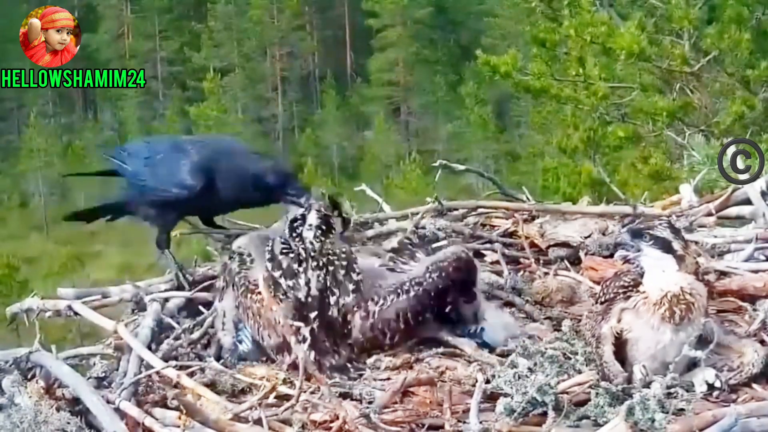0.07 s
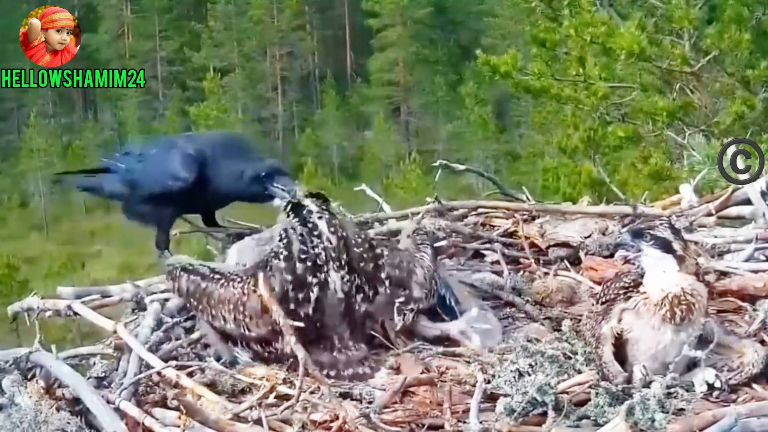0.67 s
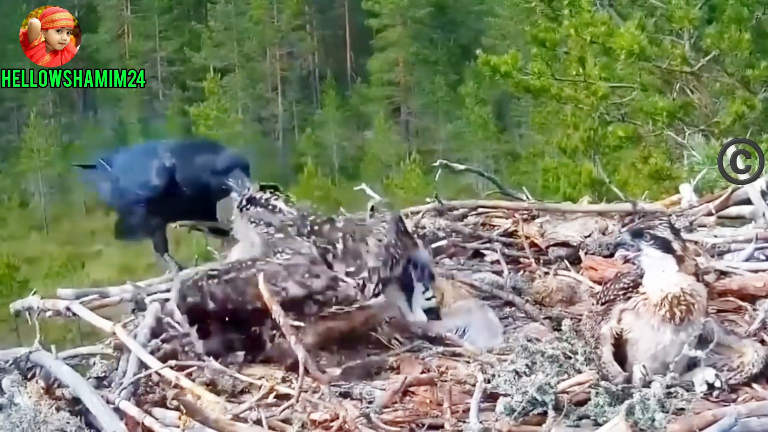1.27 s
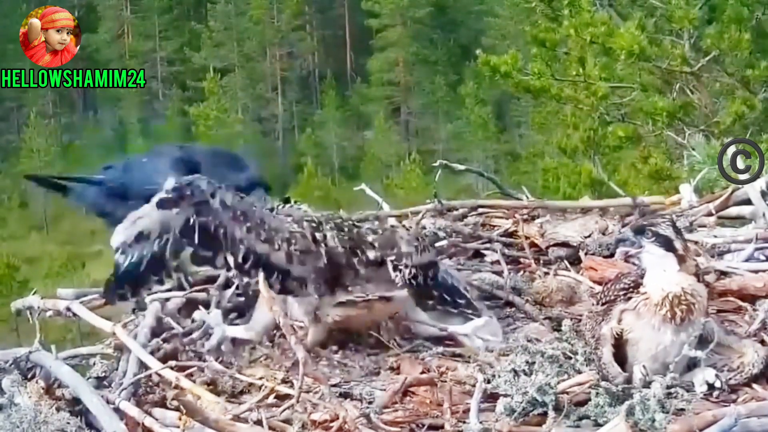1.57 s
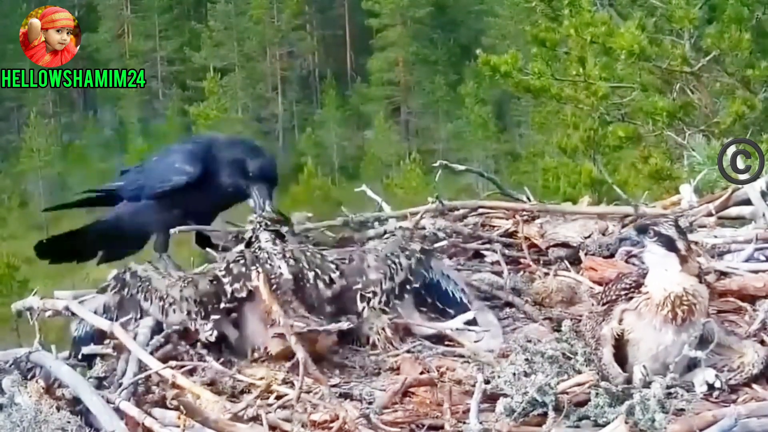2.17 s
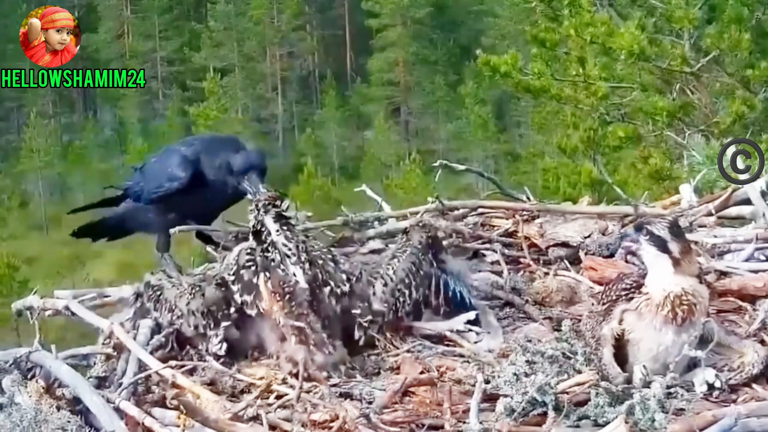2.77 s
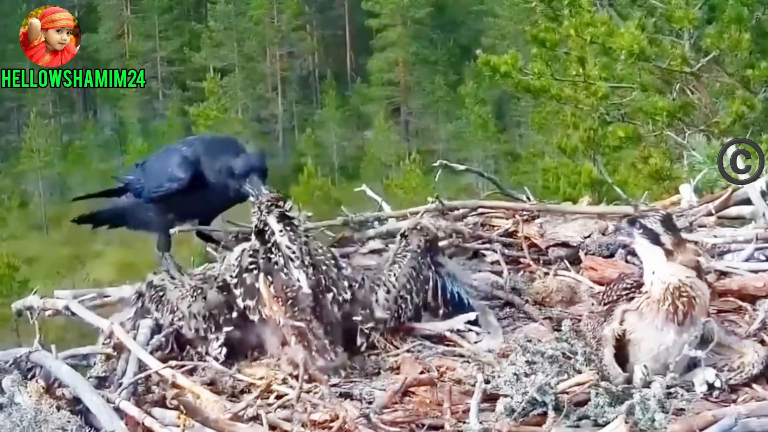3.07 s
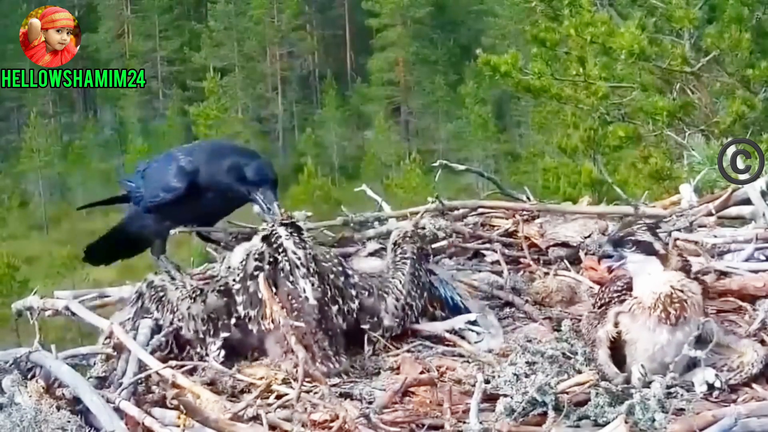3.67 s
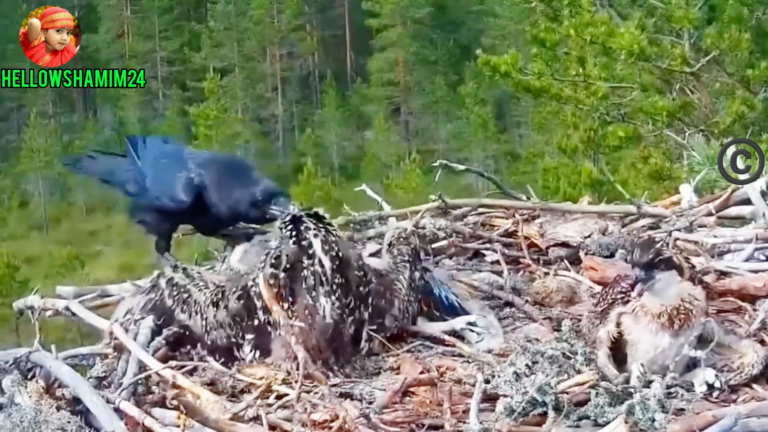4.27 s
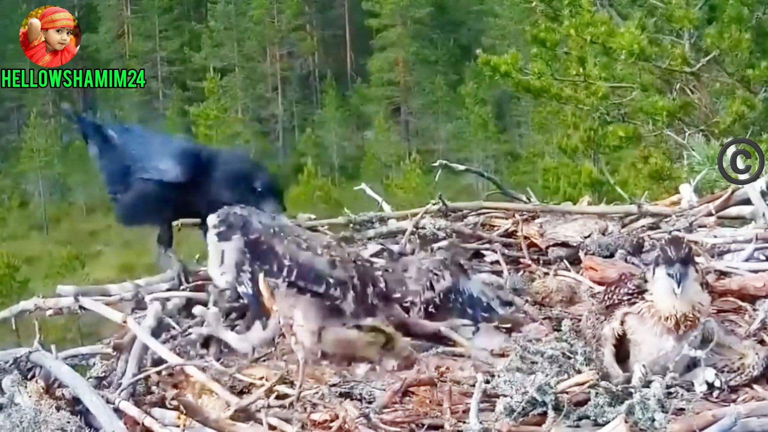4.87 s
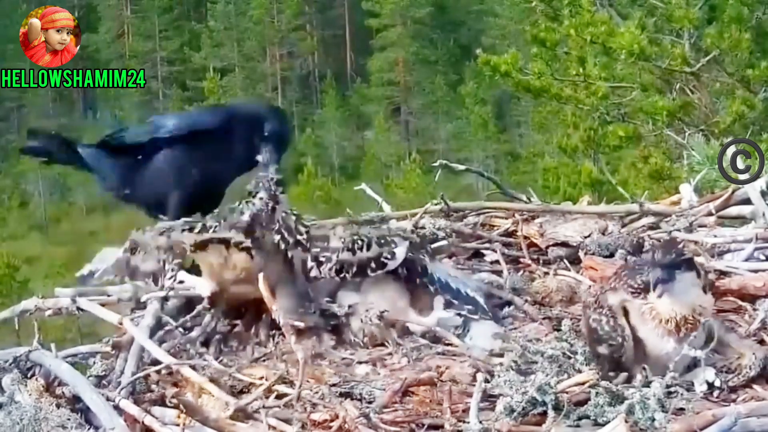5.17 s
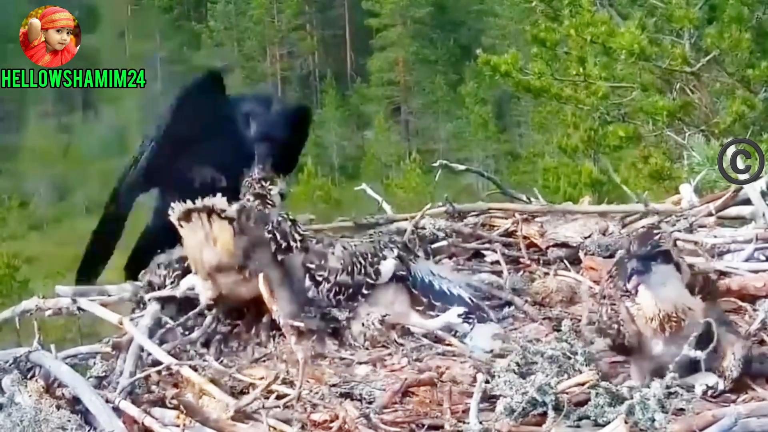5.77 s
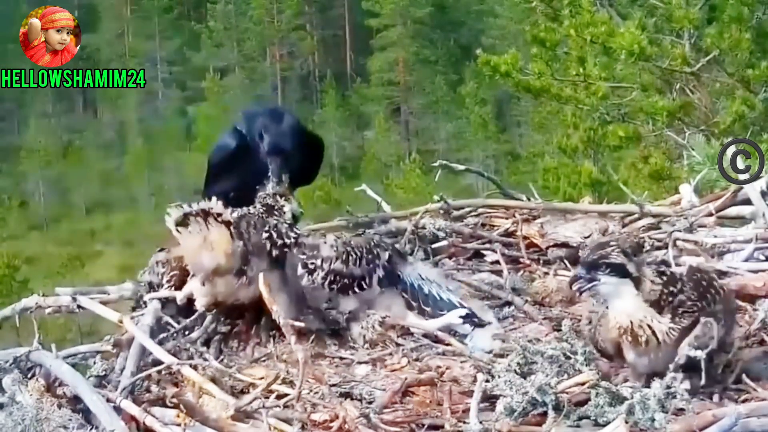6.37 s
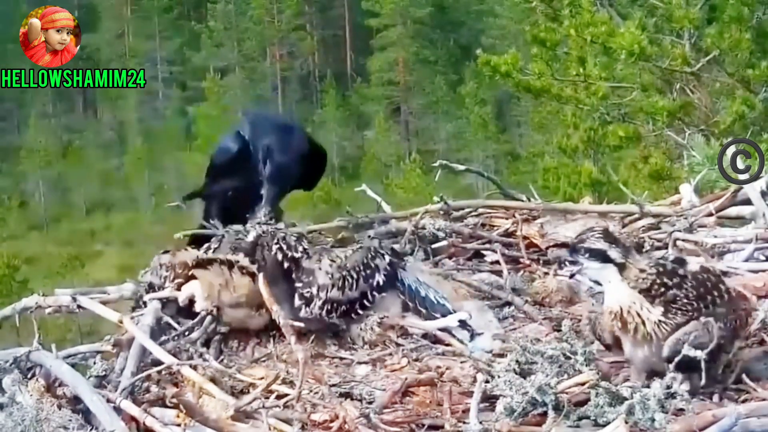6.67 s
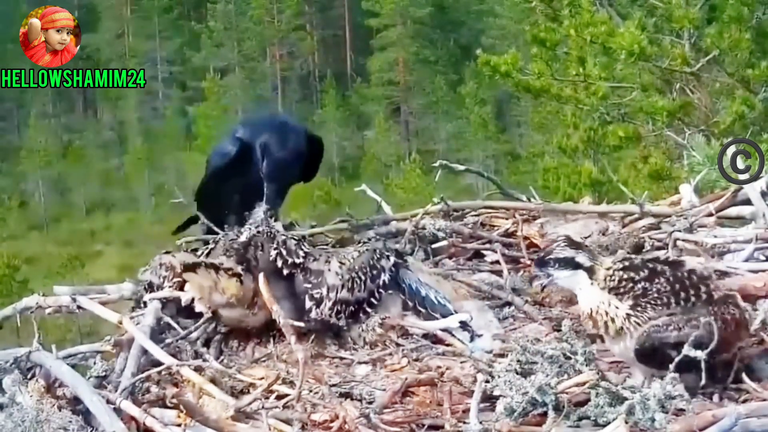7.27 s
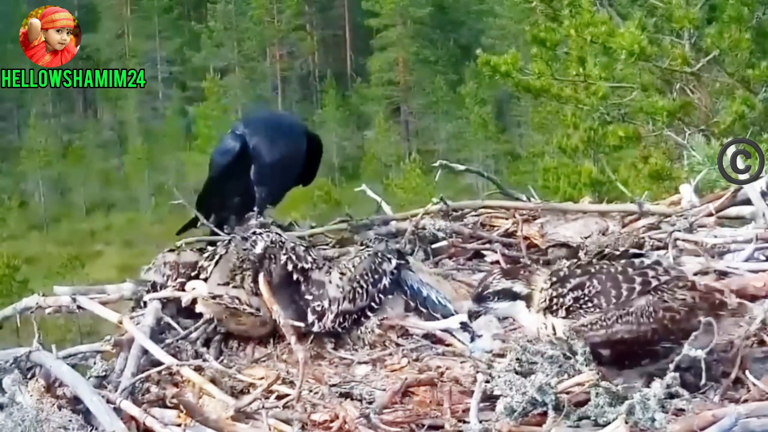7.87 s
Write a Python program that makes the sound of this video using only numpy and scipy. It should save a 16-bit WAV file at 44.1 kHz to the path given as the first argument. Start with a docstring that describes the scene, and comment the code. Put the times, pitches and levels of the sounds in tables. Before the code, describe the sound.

Birds scuffle in a stick nest, snapping twigs and brushing feathers, while a chick gives high creaky squeals over a faint hiss.

```python
"""First you hear dry twigs crackle and feathers brush: a raven is tugging at a big chick in a stick nest.
As the birds shove about, close to one microphone, fibres crunch, thick sticks knock and twigs snap.
The chick gives thin, creaky squeals, made of uneven pulses that ring at one high pitch.
Two flies buzz past on beating wings, a far one and then a near one, over a faint steady hiss."""
import sys
import numpy as np
from scipy import signal
from scipy.fft import rfft, irfft, next_fast_len
from scipy.io import wavfile
from scipy.ndimage import uniform_filter1d, map_coordinates

SR = 44100
rng = np.random.default_rng(int(sys.argv[2]) if len(sys.argv) > 2 else 0)


def materialize(psi):
    """Save the field psi as 16-bit PCM at rate SR to the path in sys.argv[1].

    A 1-D psi becomes a single channel; in a 2-D psi each row is a channel.
    """
    bounded = np.clip(np.atleast_2d(psi).T, -1, 1)
    quanta = np.round(bounded * 32767).astype(np.int16)
    wavfile.write(sys.argv[1], SR, quanta)


N = 353858
TOP_HZ = 14080  # the highest sound the microphone passes

# Tone colour of the hiss, the twigs and the feathers: frequency_hz, relative_db
HISS_COLOUR = [(25, -34), (100, -28.5), (250, -26.5), (400, -21), (600, -19), (1000, -10.5), (1600, -8.5),
               (2600, -4.5), (4500, -2), (5900, -1), (7500, -5), (10000, -8), (14000, -11)]
TWIG_COLOUR = [(150, -62), (400, -27), (800, -14), (1400, -8.5), (1900, -6.5), (2500, 0), (3500, 3),
               (5000, -1), (5900, 6), (7500, -4.5), (10000, -12), (14000, -27)]
FEATHER_COLOUR = [(120, -65), (500, -40), (2000, -15.5), (4200, 0), (6000, 0.5), (7200, -3.5), (8500, -2),
                  (10000, -5.5), (12000, -4), (14000, -8.5)]
# How fast each fly beats its wings: time_s, pitch_hz
FAR_WINGBEAT = [(2.6, 206), (2.95, 207.7), (3.1, 205.5), (3.22, 208), (3.38, 200.5), (3.55, 202.2),
                (4.0, 202.7), (4.4, 200), (4.7, 202.6)]
NEAR_WINGBEAT = [(6.42, 262), (6.465, 270), (6.5, 256.3), (6.535, 267.7), (6.58, 249), (6.605, 256),
                 (6.65, 240), (6.715, 253), (6.82, 227)]
# Tone colour of each fly's buzz: frequency_hz, relative_db
FAR_COLOUR = [(200, -30), (410, -11.5), (610, -11), (820, -0.5), (1250, 0.5), (1800, -2.5), (2450, 4.5),
              (4000, -8.5), (7000, -16)]
NEAR_COLOUR = [(250, -40), (490, -21.5), (740, -21), (1000, -16), (1250, -3), (1480, 0.5), (1720, -5.5),
               (1970, -0.5), (2300, -9), (2900, -8), (4000, -4), (7200, -7.5)]
# Moments when each fly swoops closer: closest_s, level_db, half_length_s
FAR_SWOOPS = [(3.152, -70.5, 0.074), (3.294, -68.5, .055), (3.551, -75, .1), (4.216, -74, 0.15)]
NEAR_SWOOPS = [(6.48, -59.5, 0.046), (6.63, -55, 0.022), (6.725, -55, 0.038)]
# The chick's hoarse squeals: start_s, length_s, relative_db, pitch_hz
SQUEALS = [(0.261, 0.0345, -51.5, 5804), (3.3, 0.025, -60, 5600), (3.538, .04, -55, 5200),
           (3.655, 0.1, -60.5, 5100), (3.777, 0.21, -56.5, 5000), (4.01, .17, -59, 5050),
           (6.358, 0.046, -51, 4900), (6.471, 0.185, -58, 5000), (6.784, .065, -54, 5500),
           (7.093, 0.067, -41.5, 5000), (7.19, 0.031, -43.5, 5050)]
# How hard the birds struggle, heard as rustling: time_s, relative_db
EFFORT = [(0, -60), (.5, -58.5), (.7, -62), (1.3, -52.5), (1.62, -64.5), (2.1, -56), (2.3, -66), (2.7, -77),
          (3.4, -77.5), (4.05, -64.5), (4.37, -59.5), (4.5, -56), (5.85, -51.5), (6.33, -59), (6.52, -66.5),
          (7.2, -60.5), (7.62, -57.5), (7.88, -61.5)]
# A foot or wing shoves through the nest lining: start_s, length_s, twig_relative_db, feather_relative_db
SHOVES = [(0, 0.18, -56.5, -52.5), (0.262, 0.016, -47.5, -61), (0.41, 0.16, -58, -58.5),
          (0.996, 0.083, -58, -58.5), (1.315, 0.031, -53.5, -49.5), (1.705, 0.065, -47.5, -52.5),
          (1.801, 0.079, -47, -52.5), (2.474, 0.072, -58, -60), (3.781, .06, -61.5, -58.5),
          (4.151, .08, -56, -61), (4.277, 0.042, -59.5, -57), (4.441, 0.16, -51.5, -51),
          (4.613, 0.075, -48.5, -44.5), (4.78, 0.05, -56, -49), (4.918, 0.035, -45, -52.5),
          (5.045, 0.0076, -52.5, -40.5), (5.191, 0.03, -48, -46.5), (5.251, 0.051, -44, -47.5),
          (5.445, 0.041, -52, -59), (5.629, 0.014, -38, -55), (5.7, 0.038, -48.5, -46),
          (5.929, 0.021, -48.5, -50), (6.029, 0.01, -43, -47), (6.164, 0.041, -48, -47),
          (6.259, 0.071, -48, -44.5), (6.351, 0.053, -50, -50.5), (6.789, 0.04, -62, -57),
          (6.912, .12, -54.5, -57), (7.14, 0.019, -40.5, -50), (7.255, 0.071, -50.5, -51.5),
          (7.48, 0.028, -48.5, -44), (7.518, 0.014, -42, -39), (7.703, 0.049, -44.5, -43),
          (7.95, .035, -53.5, -50)]
# Thick sticks knocking together: start_s, relative_db, pitch_hz
KNOCKS = [(0.271, -52.5, 1430), (1.728, -46.5, 1410), (1.819, -46, 1710), (4.103, -53, 1420),
          (4.446, -53, 1250), (5.304, -42.5, 1426), (5.414, -49.5, 1510), (5.64, -51, 1600),
          (5.916, -46, 1500), (6.271, -49, 1720), (6.322, -51, 1265), (7.146, -52.5, 1193),
          (7.363, -49, 1100), (7.377, -51.5, 1300), (7.525, -51, 1810)]
# The loudest twigs breaking: start_s, level_db, pitch_hz, relative_bandwidth, splinter_fade_s
SNAPS = [(0.2725, -30.5, 6170, .22, 0.0062), (0.2933, -36.5, 6650, 0.18, 0.0052),
         (0.4462, -36, 5660, 0.7, .0025), (0.554, -43, 3770, 1, .007), (1.3595, -24.5, 4350, 0.27, 0.0069),
         (1.822, -32.5, 3300, 0.69, 0.025), (1.8538, -24, 6770, .65, 0.011),
         (2.2275, -44.5, 5090, .7, 0.0061), (2.5487, -43.5, 3080, 0.29, 0.019),
         (3.6964, -43, 4710, 0.54, 0.0086), (3.808, -35.5, 4700, 0.13, .004),
         (3.8918, -31.5, 5040, 0.19, 0.0041), (4.1042, -36, 3350, 0.42, 0.0055),
         (4.1209, -41.5, 3260, 0.4, 0.0061), (4.6745, -22.5, 3860, 0.53, 0.0024),
         (5.052, -31, 6100, .56, 0.018), (5.2711, -25, 6560, 0.35, .006), (5.277, -27, 3500, 0.098, 0.0072),
         (5.2906, -25.5, 4160, 1, 0.0079), (5.303, -26.5, 5380, 0.83, 0.0038),
         (5.4123, -39, 4570, 1, 0.0097), (5.4776, -29.5, 4550, .98, 0.021),
         (5.5278, -34.5, 8030, 0.3, .0025), (5.6335, -25.5, 5570, 0.26, 0.029),
         (5.7958, -21.5, 5160, 0.51, 0.018), (6.318, -22, 4280, 0.39, 0.0059),
         (6.3223, -25.5, 3560, 0.73, 0.018), (6.4116, -26, 6820, 0.23, 0.01), (6.853, -38, 7230, .4, 0.004),
         (6.9123, -36, 4400, 1, 0.011), (6.9219, -35.5, 4030, .96, 0.012), (6.983, -33, 5100, 0.55, 0.0082),
         (7.003, -35, 5900, .83, 0.007), (7.093, -30.5, 4900, 0.1, .005), (7.161, -28, 5000, .41, 0.0057),
         (7.2087, -33.5, 4880, 0.19, 0.0058), (7.2995, -31, 7600, 0.18, 0.0025),
         (7.4809, -29.5, 3560, 0.56, 0.0041), (7.598, -32, 5200, .4, 0.025), (7.706, -34, 4760, 0.69, .01)]


def amp(db):
    """Turn decibels into a number to multiply a sound by."""
    return 10 ** (np.asarray(db) / 20)


def unit(x):
    """Scale a signal to an average (rms) level of 1."""
    return x / np.sqrt(np.mean(x ** 2) + 1e-20)


def along(points, hz):
    """Read a tone colour at hz, on a log frequency scale."""
    frequencies, levels = np.transpose(points)
    return np.interp(np.log(hz + 1), np.log(frequencies + 1), levels)


def curve(rows):
    """Join (time, value) points with straight lines, one value per sample."""
    return np.interp(np.arange(N) / SR, *np.transpose(rows))


def wobble(rate):
    """A smooth curve through `rate` random points a second."""
    points = rng.standard_normal(int(N * rate / SR) + 4)
    return map_coordinates(points, [np.arange(N) * rate / SR])


def add(out, start_s, x):
    """Mix x into out at start_s."""
    i = max(round(start_s * SR), 0)
    out[i:i + len(x)] += x[:max(len(out) - i, 0)]


def envelope(start_s, length_s, attack_s, release_s, rise_db=0):
    """A loudness shape: fade in, hold while rising by rise_db, die away."""
    t = np.arange(int((length_s + 10 * release_s) * SR)) / SR
    hold = amp(rise_db * (np.minimum(t / length_s, 1) - .5))
    release = np.exp(-np.maximum(t - length_s, 0) / release_s)
    out = np.zeros(N)
    add(out, start_s, np.minimum(t / attack_s, 1) * hold * release)
    return out


def filtered(x, response):
    """Scale each frequency in x by response(hz)."""
    size = next_fast_len(N + 8192)
    return irfft(rfft(x, size) * response(np.fft.rfftfreq(size, 1 / SR)), size)[:N]


def coloured(x, colour):
    """Give x a tone colour, at level 1."""
    return unit(filtered(x, lambda hz: amp(along(colour, hz))))


def patchy(x, depth_db):
    """Make the tone colour shift at random from moment to moment."""
    spectra = signal.stft(x, nperseg=512)[2]
    patches = uniform_filter1d(rng.standard_normal(spectra.shape), size=5, axis=0)
    patches = uniform_filter1d(patches, size=5, axis=1)
    return signal.istft(spectra * amp(depth_db * unit(patches)), nperseg=512)[1][:N]


def resonance(x, hz, octaves, low_hz=1000):
    """A broad ring, `octaves` to each side of hz; like thin wood, it gives off no bass."""
    edges = [min(hz / 2 ** octaves, SR / 4), min(hz * 2 ** octaves, TOP_HZ)]
    ring = signal.lfilter(*signal.butter(1, edges, "band", fs=SR), x)
    return signal.lfilter(*signal.butter(3, low_hz, "high", fs=SR), ring)


def hiss(level_db=-62.5):
    """A thin, nearly steady hiss behind everything."""
    level = amp(level_db + 0.81 * wobble(1.2))
    return level * coloured(patchy(rng.standard_normal(N), depth_db=2.1), HISS_COLOUR)


def far_fly_hum(level_db=-102.5, swell_db=4, waver_hz=5):
    """A faint tone at twice the far fly's wingbeat carries even when the rest of its buzz is lost."""
    level = envelope(start_s=1.64, length_s=3.3, attack_s=.15, release_s=.15)
    level *= amp(level_db + swell_db * wobble(8.7))
    pitch = 2 * curve(FAR_WINGBEAT) + waver_hz * wobble(14)
    return level * np.sin(2 * np.pi * np.cumsum(pitch) / SR)


def fly(wingbeat, swoops, colour, waver, turning_db=3.0, harmonics=32):
    """Wings make tones at multiples of their beat; each tone swells and fades as the fly turns."""
    t = np.arange(N) / SR
    pitch = curve(wingbeat)
    phase = 2 * np.pi * np.cumsum(pitch * (1 + waver * wobble(45))) / SR
    swells = [amp(db) / (1 + ((t - closest_s) / half_s) ** 2) for closest_s, db, half_s in swoops]
    heard = (t > wingbeat[0][0]) & (t < wingbeat[-1][0])
    turn_times = np.arange(0, N / SR, .06)
    buzz = np.zeros(N)
    for k in range(1, harmonics + 1):
        turning = np.interp(t[heard], turn_times, rng.standard_normal(len(turn_times)))
        db = along(colour, k * pitch[heard]) + turning_db * turning
        buzz[heard] += amp(db) * np.sin(k * phase[heard] + 2 * np.pi * rng.random())
    return np.linalg.norm(swells, axis=0) * buzz / np.std(buzz[heard])


def chick_squeals(gain_db=-1.5, pulses_per_s=560, half_width_hz=450, grit_db=-10):
    """Uneven pulses and a little hiss set off one high, narrow ring, which sounds hoarse and creaky."""
    level = sum(amp(db) * envelope(start, length, attack_s=.006, release_s=.018)
                for start, length, db, _ in SQUEALS)
    pitch = curve([(at, hz) for start, length, _, hz in SQUEALS for at in (start, start + length)])
    pulses = rng.random(N) < pulses_per_s / SR
    sizes = np.exp(0.67 * np.clip(rng.standard_normal(N), -2, 2))
    force = pulses * sizes * rng.choice([-1, 1], N) + 0.1 * rng.standard_normal(N)
    flutter = signal.lfilter(*signal.butter(3, half_width_hz, fs=SR), force)
    ring = flutter * np.sin(2 * np.pi * np.cumsum(pitch) / SR)
    grit = resonance(force, hz=4700, octaves=0.71)
    return amp(gain_db) * level * (unit(ring) + amp(grit_db) * unit(grit))


def shoves():
    """Each shove builds slightly, then lets go; returns the power put into twigs and into feathers."""
    twigs, feathers = np.zeros((2, N))
    for start, length, twig_db, feather_db in SHOVES:
        power = envelope(start, length, attack_s=.0032, release_s=.016, rise_db=0.5) ** 2
        twigs += amp(twig_db) ** 2 * power
        feathers += amp(feather_db) ** 2 * power
    return twigs, feathers


def jolts(per_s, settle_s):
    """Sudden shifts of the stick pile, each dying away; the curve swings around 0."""
    kicks = (rng.random(N) < per_s / SR) * rng.uniform(0.64, 1, N)
    load = signal.lfilter([1], [1, -np.exp(-1 / (settle_s * SR))], kicks)
    return unit(load - load.mean())


def ticks(centre_hz, scatter, spread_db, per_s=2200, fade_cycles=1.6):
    """Tiny breaks, each a very short ring of random time, pitch and size."""
    when, pitch_draw, size_draw = np.hsplit(rng.random((int(per_s * N / SR), 3)), 3)
    hz = np.clip(centre_hz * np.exp(scatter * (2 * pitch_draw - 1)), 300, TOP_HZ)
    size = amp(spread_db * np.minimum(-np.log(1 - size_draw), 5)) * np.sqrt(hz)
    samples = np.arange(160)
    cycles = hz * samples / SR
    rings = size * np.sin(2 * np.pi * cycles) * np.exp(-cycles / fade_cycles)
    positions = (when * N).astype(int) + samples
    return unit(np.bincount(positions.ravel(), rings.ravel(), N)[:N])


def rustle(twig_push, feather_push, twig_db=-2, feather_db=0.46, push_db=-2):
    """Twigs crackle in clumps as the birds shift and shove; feather barbs tick finely over them."""
    effort_power = amp(curve(EFFORT)) ** 2
    clumps = jolts(per_s=150, settle_s=0.01)
    twig_level = np.sqrt(effort_power + amp(push_db) ** 2 * twig_push) * amp(twig_db + 1.5 * clumps)
    feather_level = np.sqrt(effort_power + feather_push) * amp(feather_db + 1.7 * clumps)
    crackle = ticks(centre_hz=4290, scatter=1.2, spread_db=2) + rng.standard_normal(N)
    barbs = ticks(centre_hz=8560, scatter=0.56, spread_db=4) + rng.standard_normal(N)
    twigs = coloured(patchy(crackle, depth_db=2.5), TWIG_COLOUR)  # different sticks take the load in turn
    feathers = coloured(patchy(barbs, depth_db=2.1), FEATHER_COLOUR)
    return twig_level * twigs + feather_level * feathers


def crunches(twig_push, gain_db=-6, spikiness=.55):
    """Weight on the nest lining breaks a swelling cloud of fibres."""
    noise, sizes = rng.standard_normal((2, N))
    fibres = noise * np.exp(spikiness * sizes[np.arange(N) // 12])  # a new size every 12 samples
    crunch = unit(resonance(fibres, hz=5200, octaves=.36, low_hz=940))
    return amp(gain_db) * np.sqrt(twig_push) * crunch


def knocks(gain_db=-1.5, fade_s=0.015, octaves=0.67):
    """Heavier sticks bump together with a short, dull, woody tock."""
    out = np.zeros(N)
    t = np.arange(SR // 20) / SR
    for start, db, hz in KNOCKS:
        bump = rng.standard_normal(len(t)) * amp(-60 * t / fade_s)
        tock = resonance(bump, hz, octaves, low_hz=0.83 * hz)
        add(out, start, amp(db + gain_db) * tock / np.std(tock[:SR // 250]))  # level of the first 4 ms
    return out


def flicks(over_db=13.5, spread_db=2, centre_hz=4700, scatter=.18, width=.6, fade_s=0.0077, count=70):
    """Small twigs flick at random, harder when the birds struggle harder; rows as in SNAPS."""
    times = (np.arange(count) + rng.random(count)) * N / SR / count
    size_draw, pitch_draw = np.clip(rng.standard_normal((2, count)), -2, 2)
    levels = np.interp(times, *np.transpose(EFFORT)) + over_db + spread_db * size_draw
    pitches = centre_hz * np.exp(scatter * pitch_draw)
    return [(start, db, hz, width, fade_s) for start, db, hz in zip(times, levels, pitches)]


def snaps(shiver_db=-23, shiver_fade_s=.03, ring_fade_s=.014, soften_hz=12500):
    """A twig breaks with a click, splinters and rings as it bends, while the sticks around it shiver."""
    out = np.zeros(N)
    t = np.arange(SR // 20) / SR
    click = t == 0
    tearing = signal.butter(1, soften_hz, fs=SR)  # fibres tear, so the break is not instant
    for start, db, hz, width, fade_s in SNAPS + flicks():
        splinters, shiver = rng.standard_normal((2, len(t)))
        splinters *= amp(-60 * t / fade_s)
        shiver *= amp(shiver_db - 60 * t / shiver_fade_s)
        force = signal.lfilter(*tearing, click + 0.86 * (splinters + shiver))
        ring_hz = hz * np.array([[.62], [.92], [1.33]]) * np.exp(0.073 * rng.standard_normal((3, 1)))
        ring = 0.1 * np.sin(2 * np.pi * ring_hz * t).sum(0) * amp(-60 * t / ring_fade_s)
        crack = resonance(force + ring, hz, octaves=0.72 * width, low_hz=.33 * hz)
        strength = np.sqrt(np.sum(crack ** 2) * 1000 / SR)  # as if all its energy fell within 1 ms
        add(out, start, amp(db) * crack / strength)
    return out


def scene():
    """Everything reaches one microphone, so both channels are alike."""
    twig_push, feather_push = shoves()
    far_fly = fly(FAR_WINGBEAT, FAR_SWOOPS, FAR_COLOUR, waver=.003) + far_fly_hum()
    near_fly = fly(NEAR_WINGBEAT, NEAR_SWOOPS, NEAR_COLOUR, waver=.00598)
    mono = snaps() + knocks() + chick_squeals() + far_fly + near_fly + hiss()
    mono += rustle(twig_push, feather_push) + crunches(twig_push)
    return np.array([mono, mono])


def record(dry):
    """Cut away the treble above TOP_HZ."""
    return np.array([filtered(x, lambda hz: 1 / np.sqrt(1 + (hz / TOP_HZ) ** 200)) for x in dry])


dry = scene()
out = record(dry)
materialize(out)
```